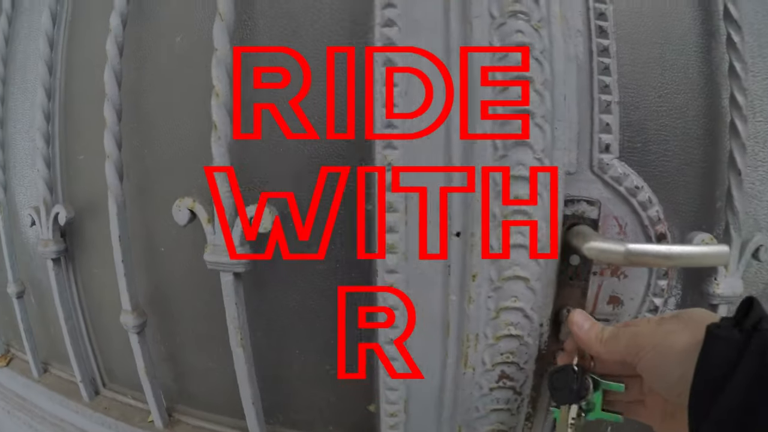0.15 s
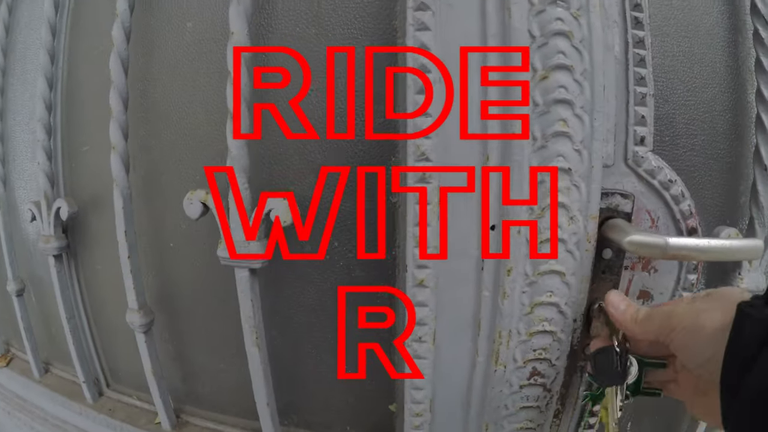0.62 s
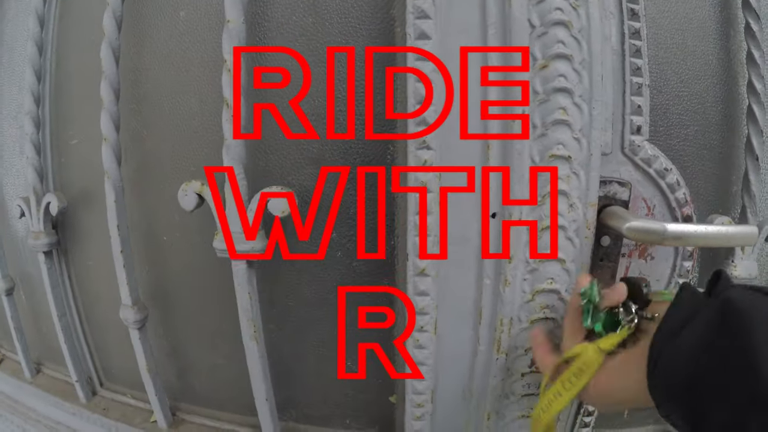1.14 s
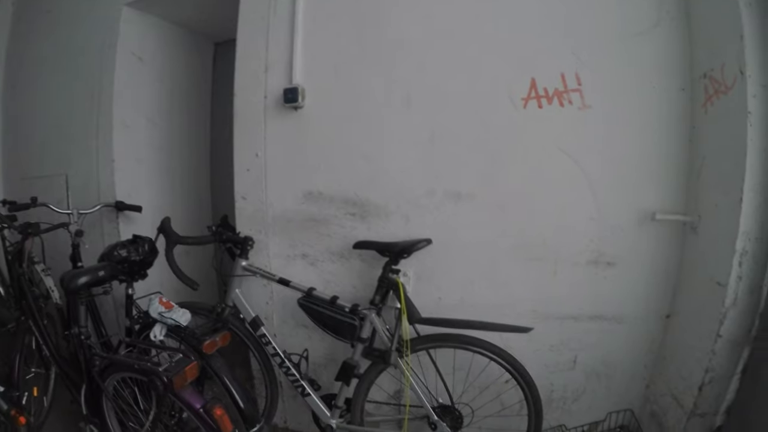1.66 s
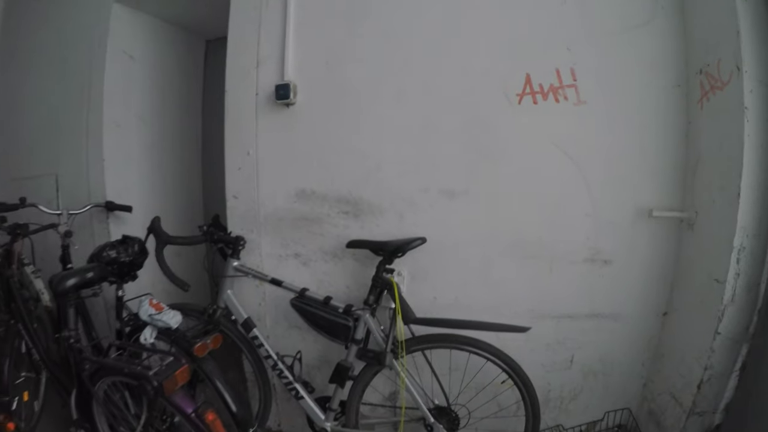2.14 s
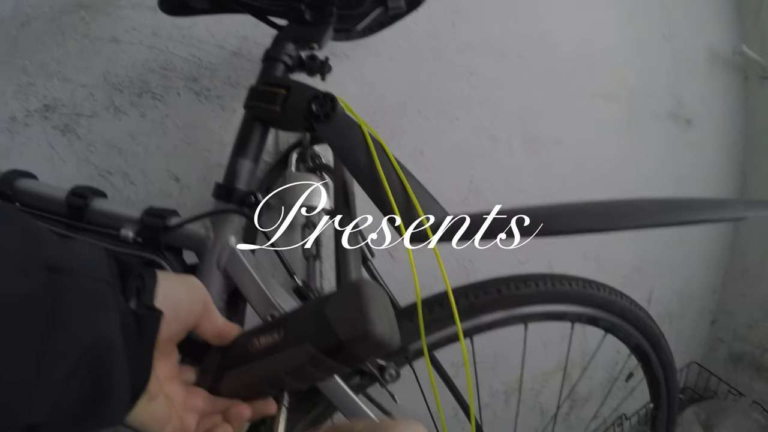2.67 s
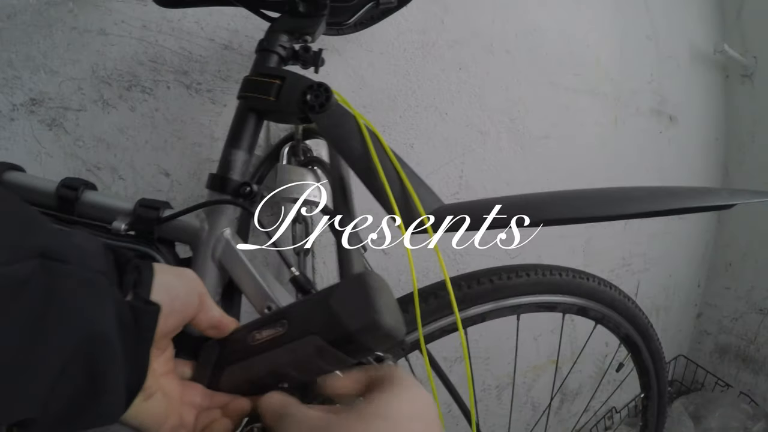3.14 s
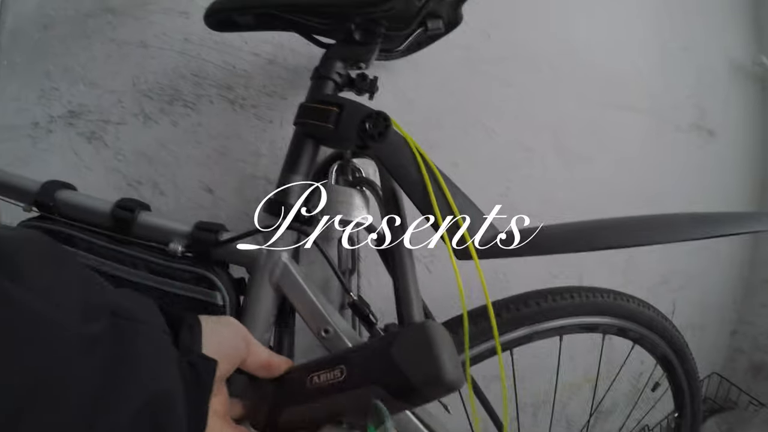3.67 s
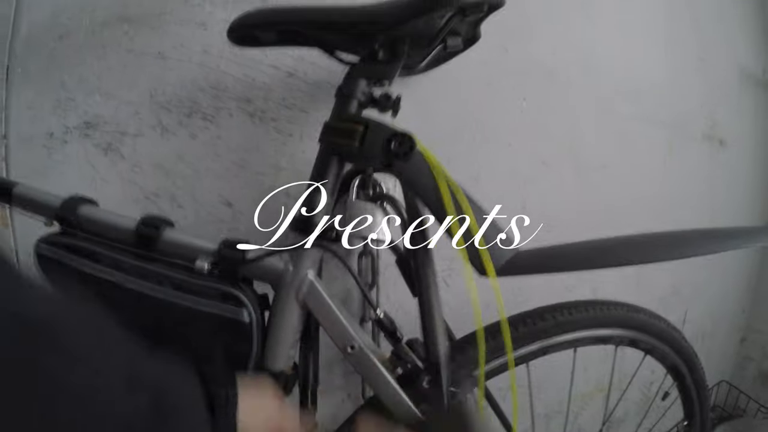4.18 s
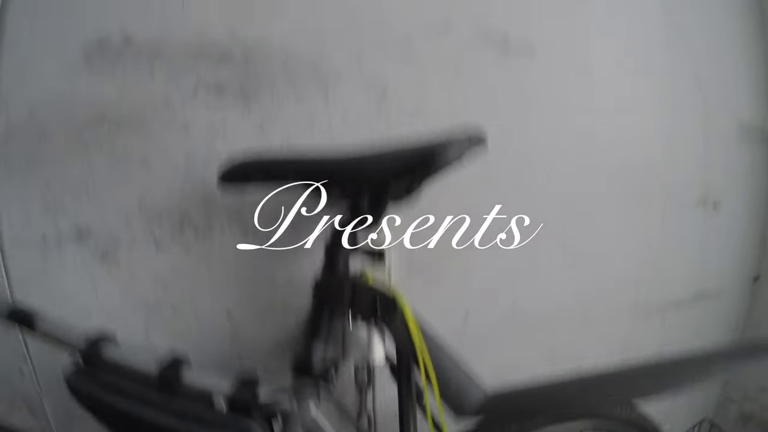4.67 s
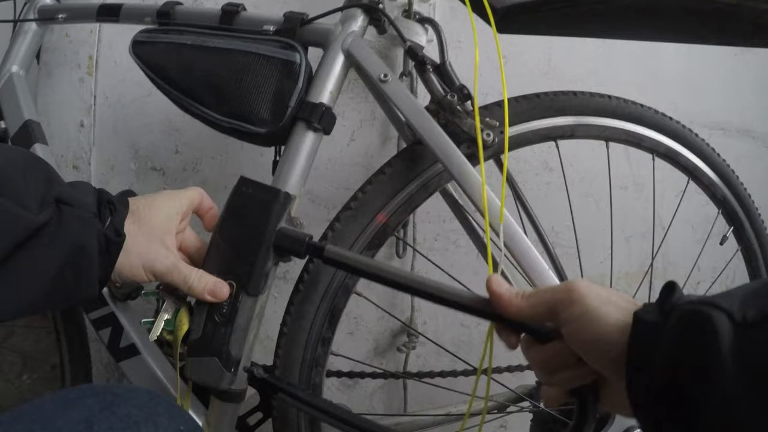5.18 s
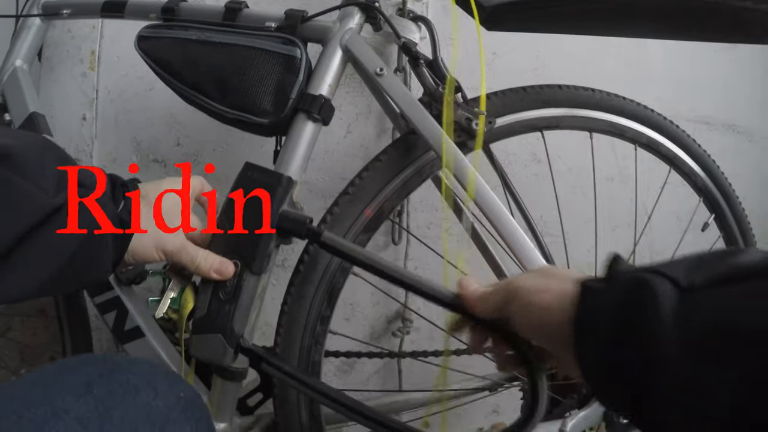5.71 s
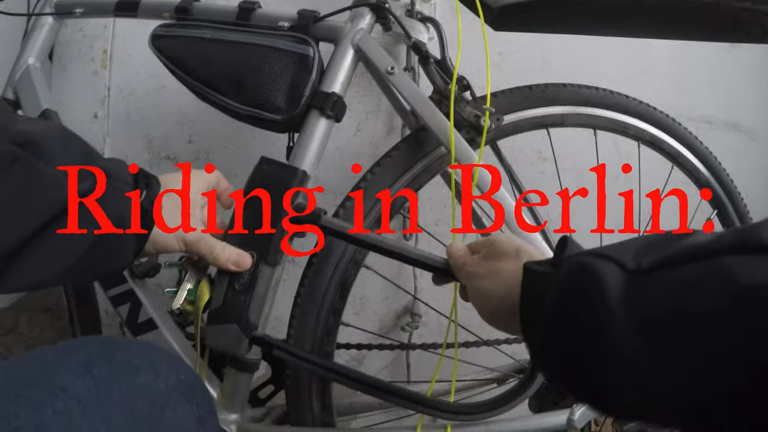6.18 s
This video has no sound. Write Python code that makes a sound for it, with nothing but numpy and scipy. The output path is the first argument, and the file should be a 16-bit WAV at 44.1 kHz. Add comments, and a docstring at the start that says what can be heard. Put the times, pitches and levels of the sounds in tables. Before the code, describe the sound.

A close microphone starts on a brief rustle at a street door, over low rumble. From 0.3 s a key ticks lightly in the lock; clicks thicken from 0.8 s, and a loud double clack with a dull thud lands at 1.22 s, then small scrapes. At 1.5 s a hard cut moves to a quiet, hard-walled passage: sparse faint clinks, a little jingle near 2.3 s. Another cut follows. A dull knock at 2.65 s and a sharp snap at 2.89 s lead into bright key jingling, with a piercing ping at 3.41 s and thin tinkles until 4.1 s. At 4.2-4.4 s a steel link clanks and rings, the lock thumps the frame, and loose fittings shudder. Cloth rustles; a hard crack comes at 5.05 s with echo. After a cut at 5.26 s it is quiet, with a knock and rustle at 5.74 s and soft bumps around 6 s, ending at 6.4 s.

```python
"""First, at a door, a key is turned with small clicks and pulled from the lock.
Then, in a hard-walled passage, a bunch of keys jingles, a folding bike lock is unlatched, knocked against
the frame and unfolded. Short bursts of noise make the contacts; decaying sines make the ringing metal.
Hands and cloth rustle and street rumble lies under it all; three hard cuts join four places.
Each place adds its own echo."""
import sys
import numpy as np
from scipy import signal
from scipy.fft import rfft, irfft
from scipy.io import wavfile

SR = 44100
rng = np.random.default_rng(int(sys.argv[2]) if len(sys.argv) > 2 else 0)


def file_out(sig):
    """Save sig as 16-bit WAV at sys.argv[1]."""
    # one column per channel
    cols = np.atleast_2d(sig).T
    # limit, then scale
    lim = np.clip(cols, -1, 1)
    pcm = np.round(lim * 32767).astype(np.int16)
    wavfile.write(sys.argv[1], SR, pcm)


def boost_factor(decibels):
    """Convert a level in decibels to a linear amplitude factor."""
    exponent = np.asarray(decibels, float) / 20
    return 10 ** exponent


N = 279053


def rms_one(x):
    """Scale to rms 1."""
    return x / np.sqrt(np.mean(x ** 2) + 1e-20)


def in_time(rows):
    """Draw straight lines between the points of a table, one value per sample for each column."""
    seconds, *columns = np.transpose(rows)
    return [np.interp(np.arange(N) / SR, seconds, column) for column in columns]


def at_door():
    """True for the samples before the first place, the door, ends."""
    return np.arange(N) < PLACES[0][1] * SR


def coloured(x, spectrum):
    """Shape the spectrum of x through (frequency [Hz], relative density [dB per Hz]) points; rms 1."""
    hz, db = np.transpose(spectrum)
    grid = np.maximum(np.arange(N // 2 + 1) * SR / N, 1)
    gain = boost_factor(np.interp(np.log(grid), np.log(hz), db))
    return rms_one(irfft(rfft(x) * gain, N))


def band(x, low_hz, high_hz):
    """Keep the sound between two frequencies with a Butterworth filter."""
    return signal.sosfilt(signal.butter(2, [low_hz, high_hz], "band", fs=SR, output="sos"), x)


def grains(spread_db):
    """A tiny touch at every sample, few of them large; rms 1."""
    sizes = boost_factor(spread_db * np.minimum(rng.exponential(1, N), 6))
    return rms_one(sizes * rng.choice([-1, 1], N))


def ring(clicks, hz, t60):
    """A unit click starts a dying sine of height 1, which falls by 60 dB in t60 seconds."""
    r, w = boost_factor(-60 / (t60 * SR)), 2 * np.pi * hz / SR
    return signal.lfilter([0, np.sin(w)], [1, -2 * r * np.cos(w), r * r], clicks + 1e-18)


def hollow(x, peaks):
    """Add resonances (frequency [Hz], width [Hz], level [dB]) to the plain sound."""
    out = x
    for hz, width, db in peaks:
        r = np.exp(-np.pi * width / SR)
        poles = [1, -2 * r * np.cos(2 * np.pi * hz / SR), r * r]
        out = out + boost_factor(db) * signal.lfilter([(1 - r * r) / 2, 0, (r * r - 1) / 2], poles, x)
    return out


def bursts(rows, gains_db, rise):
    """Loudness shapes that swell for a share of each event's t60, then die away ever faster."""
    t, shape = np.arange(SR // 2) / SR, np.zeros((gains_db.shape[1], N + SR))
    for (start, t60), db in zip(rows, gains_db):
        swell = 1 - np.exp(-t / (rise * t60))
        fall = boost_factor(-60 * (t / t60) ** 1.1) * swell
        shape[:, round(start * SR):][:, :len(t)] += boost_factor(db)[:, None] * fall / fall.max()
    return shape[:, :N]


# loudness of the street rumble: (time [s], level [dB])
RUMBLE_LEVEL = [(0, -33.5), (.85, -30.5), (1.5, -34), (2.3, -38.5), (4.2, -35.5), (4.5, -33), (5.4, -37),
                (6.33, -39)]
# rumble heard at the door: (frequency [Hz], relative density [dB per Hz])
DOOR_RUMBLE = [(12, -8), (28, 0), (55, 1), (80, -11.5), (180, -19), (300, -32.5), (500, -63)]
# rumble gathered on the low modes of the passage walls: (frequency [Hz], relative density [dB per Hz])
PASSAGE_RUMBLE = [(15, -25), (35, 4), (50, -6), (65, -2.5), (95, -19.5), (130, -20.5), (170, -24),
                  (330, -33.5), (500, -63.5)]
# steady hush: (frequency [Hz], relative density [dB per Hz])
HUSH = [(71, -16.5), (120, -3.5), (177, -9.5), (282, -19), (332, 8.5), (509, -11.5), (5170, -16.5),
        (11900, -41), (15500, -30.5)]
HUSH_DB = -62.5


def street():
    """Low shaped noise swells and sinks as rumble, over a steady hush."""
    rumble_db, = in_time(RUMBLE_LEVEL)
    traffic = rng.standard_normal(N)
    rumble = np.where(at_door(), coloured(traffic, DOOR_RUMBLE), coloured(traffic, PASSAGE_RUMBLE))
    hush = coloured(rng.standard_normal(N), HUSH)
    return boost_factor(rumble_db) * rumble + boost_factor(HUSH_DB) * hush


def busy():
    """How many contacts fall near each moment; one contact reaches about 47 ms to either side."""
    reach_s = 0.047
    moments = np.arange(0, N / SR, 1 / 1000)
    near = sum(np.exp(-.5 * ((moments - row[0]) / reach_s) ** 2) for row in TURNS + CLINKS + KNOCKS)
    return np.interp(np.arange(N) / SR, moments, near)


# hands, cloth and sliding links, before crowded contacts raise them:
# (time [s], dull level [dB], bright level [dB])
RUSTLE = [(0.0, -25.5, -35.5), (.082, -49, -66), (.185, -55, -99), (1.3, -49, -64), (1.529, -56.5, -63),
          (2.01, -57.5, -55), (2.14, -64, -73.5), (2.36, -59, -62), (2.908, -56, -62.5),
          (3.3, -55.5, -58.5), (3.634, -53.5, -64.5), (3.84, -56, -59.5), (4.188, -60, -72.5),
          (4.4, -33.5, -67.5), (4.56, -37, -69), (4.949, -57.5, -63.5), (5.238, -55.5, -54.5),
          (5.273, -60.5, -73.5), (5.72, -66, -72.5), (5.8, -41, -47.5), (5.961, -56, -66),
          (6.326, -62, -68)]
# colour of the dull rubbing: (frequency [Hz], relative density [dB per Hz])
DULL = [(88, -23.5), (150, -2), (385, 7), (713, 4), (861, 3), (1280, -1), (2100, -0.5), (9000, -23.5),
        (11700, -48), (19800, -120)]
# colour of the bright key rattle: (frequency [Hz], relative density [dB per Hz])
BRIGHT = [(1500, -16.5), (3000, -1.5), (4700, 1), (5800, -0.5), (6800, -1.5), (9000, -4.5), (15500, -12.5)]


def rustle():
    """Rubbing makes dense dull grains; keys add bright grains in small random rattles."""
    (dull_db, bright_db), crowd = in_time(RUSTLE), busy()
    # each nearby contact raises the rustle by these dB
    dull_db, bright_db = dull_db + 1 * crowd, bright_db + 3.5 * crowd
    # about 90 small knocks a second, each fading with a 4 ms time constant
    knocks = (rng.random(N) < 90 / SR) * boost_factor(7.2 * rng.exponential(1, N).clip(0, 3))
    rattles = rms_one(2.9 + signal.lfilter([1], [1, -np.exp(-1 / (.004 * SR))], knocks))
    dull = coloured(grains(spread_db=4.0), DULL)
    bright = coloured(grains(spread_db=5.0) * rattles, BRIGHT)
    return boost_factor(dull_db) * dull, boost_factor(bright_db) * bright


# dull thuds of the lock on door or frame: (time [s], level [dB], t60 [s])
THUDS = [(1.235, -28.5, 0.22), (2.333, -49, 0.042), (3.683, -47, 0.21), (3.81, -43.5, 0.56),
         (4.342, -21.5, 0.056), (4.375, -29, 0.16), (5.742, -33, 0.14), (5.974, -38.5, 0.083),
         (6.031, -44, 0.077)]


def thuds():
    """Soft heavy knocks: dying noise, mostly between 110 and 900 Hz."""
    rows = np.array(THUDS)
    noise = rms_one(band(rng.standard_normal(N), 110, 900))
    return noise * bursts(rows[:, [0, 2]], rows[:, [1]], rise=0.0054)[0]


# the bike frame shudders after a bump: (time [s], level [dB], t60 [s])
SHUDDERS = [(4.375, -29.5, 0.73), (4.53, -32.5, 0.15)]
# frame tubes: (frequency [Hz], relative level [dB])
TUBES = [(1500, -2), (2055, -1), (2400, 0), (2872, -2), (3323, -2), (3900, -8)]


def frame():
    """Loose fittings rattle on the tubes, which ring for 16 ms, until the shudder dies."""
    rows = np.array(SHUDDERS)
    touch = grains(spread_db=7.0)
    tubes = rms_one(sum(boost_factor(db) * ring(touch, hz, t60=.016) for hz, db in TUBES))
    return tubes * bursts(rows[:, [0, 2]], rows[:, [1]], rise=0.0027)[0]


# blows on a steel link: (time [s], level [dB], dulling above 5 kHz [dB per kHz])
CLANKS = [(4.2223, -24, 1.5), (4.259, -5, 0.2)]
# modes of the link: (frequency [Hz], level relative to the blow [dB], t60 [s])
LINK_MODES = [(2060, -24, .04), (2880, -20, .2), (3806, -12, .23), (4996, 2, .066), (5000, -29, .14),
              (6180, -13, .13), (6192, -26, .4), (7477, -19, .35), (8312, -38, .2), (9087, -13, .09),
              (9216, -21, .22), (10470, -32, .36), (12050, -16, .05), (12030, -32, .28), (13750, -17, .03),
              (14480, -16, .066)]


def link():
    """A blow makes all modes of the steel link ring, in slightly different strengths each time."""
    blows, out = np.array(CLANKS), np.zeros(N)
    luck_db = rng.normal(0, 1, (len(blows), len(LINK_MODES)))
    for k, (hz, db, t60) in enumerate(LINK_MODES):
        dulling_db = blows[:, 2] * max(hz / 1000 - 5, 0)
        clicks = np.zeros(N)
        clicks[(blows[:, 0] * SR).astype(int)] = boost_factor(blows[:, 1] + db + luck_db[:, k] - dulling_db)
        out += ring(clicks, hz, t60)
    tremble_db = 1 * rms_one(band(rng.standard_normal(N), 43, 190))
    return band(out, 2000, 19000) * boost_factor(tremble_db)


# single keys left ringing: (time [s], level before the tremble [dB], nearest mode [Hz])
PINGS = [(1.529, -39, 5830), (2.296, -26, 4670), (3.199, -29, 5830), (3.236, -40, 12640),
         (3.325, -30, 14950), (3.329, -42.5, 10530), (3.409, -7.5, 14950), (3.41, -17, 12640),
         (3.411, -22, 11250), (3.410, -34.5, 14060), (3.413, -29, 6233), (3.634, -49, 10530),
         (3.701, -26, 14500), (3.752, -40, 11890), (3.79, -27.5, 14500), (3.79, -34, 9700),
         (3.813, -27, 12640), (3.823, -25.5, 11250), (3.824, -41.5, 7960), (3.826, -23.5, 14950),
         (3.836, -18, 14500), (3.899, -37, 7960), (3.91, -40.5, 14060), (3.952, -16, 14500),
         (3.956, -36, 9700), (3.994, -32.5, 7960), (3.76, -56.5, 5620), (3.997, -41, 5620),
         (3.996, -27.5, 4670), (3.999, -19, 14500), (4.085, -30, 5830), (4.668, -51.5, 14060),
         (5.05, -36, 11890)]
# modes of the key bunch, played by pings() and shimmer():
# (frequency [Hz], relative level when brushed [dB], t60 when struck alone [s])
KEY_MODES = [(4670, -31, .05), (5620, -28, .25), (5830, -28, .06), (6233, -36, .08), (7360, -38, .08),
             (7960, -34, .09), (9700, -38, .14), (10530, -37, .18), (11250, -34, .06), (11890, -37, .17),
             (12640, -35, .05), (13680, -36, .05), (14060, -35, .07), (14500, -30, .04), (14950, -33, .05)]


def pings():
    """A ping sets one key mode ringing; neighbours brush the key, so the ring trembles and is soon damped."""
    out, t = np.zeros(N + SR), np.arange(SR // 2) / SR
    tremble = boost_factor(4 * rms_one(band(rng.standard_normal(N + SR), 30, 250)))
    for start, db, hz in PINGS:
        mode_hz, _, t60 = min(KEY_MODES, key=lambda mode: abs(mode[0] - hz))
        fade = boost_factor(db - 60 * t / t60) * (1 - np.exp(-t / 0.00029))
        out[round(start * SR):][:len(t)] += fade * np.sin(2 * np.pi * mode_hz * t)
    return (out * tremble)[:N]


def shimmer(touches):
    """All touches stir the key modes; how freely a key hangs changes every 25 ms, less freely at the door."""
    out, free = 0, np.where(at_door(), .3, 1)
    for hz, db, _ in KEY_MODES:
        loose = np.repeat(boost_factor(rng.normal(db, 4.5, N // 1100 + 1)), 1100)[:N]
        out = out + ring(touches * free * loose, hz, t60=.045)
    return boost_factor(-5) * out


def parts(x, times, scatter_db):
    """Small parts resonate, with new strengths at every contact but the same total."""
    width_hz = 320  # at 2 kHz; higher parts are wider
    order = np.argsort(times)
    latest = order[np.maximum(np.searchsorted(times[order] * SR, np.arange(N)) - 1, 0)]
    centres = np.geomspace(2200, 14000, 14)
    luck_db = rng.normal(0, 1, (len(times), len(centres))).clip(-3, 2) * scatter_db[:, None]
    luck = boost_factor(luck_db)
    luck = luck / np.sqrt(np.mean(luck ** 2, axis=1, keepdims=True))
    out = x
    for k, hz in enumerate(centres):
        stirred = x * (luck[latest, k] - 1)
        # keep the resonance alone, without the plain sound
        out = out + hollow(stirred, [(hz, width_hz * np.sqrt(hz / 2000), 0)]) - stirred
    return out


# The levels below hold before the locks and small parts colour the sound.
# key working in the door lock: (time [s], level [dB], treble over bass [dB], chatter t60 [s])
TURNS = [(0.315, -54, 16, 0.093), (.357, -42.5, -6, 0.039), (0.377, -55, 10, .02),
         (0.398, -42.5, -19.5, 0.046), (.461, -53, -12, .02), (0.5204, -49.5, -27, 0.037),
         (0.5343, -50, 24, .017), (0.6037, -38, -0.5, 0.034), (0.651, -60, 33, 0.037),
         (0.721, -50.5, -23, 0.019), (0.7693, -48, 3.5, 0.014), (0.7833, -44, 13, 0.017),
         (0.8022, -41.5, 8.5, 0.077), (0.8204, -36.5, -4, 0.071), (.836, -40, 11.5, 0.048),
         (0.8535, -33.5, -1.5, 0.096), (0.887, -48.5, 18, 0.029), (0.9611, -34.5, 0.5, 0.041),
         (0.9766, -32.5, -10, 0.017), (0.992, -48, 0.5, 0.03), (1.003, -34, 14, 0.016),
         (1.01, -39, -1, 0.14), (1.1187, -34.5, -8, 0.046), (1.139, -32, -10.5, 0.058),
         (1.1598, -35, 3, 0.043), (1.177, -42, -5, 0.015), (1.189, -28.5, -7, 0.12),
         (1.21, -35, -29.5, 0.02), (1.222, -15, -9.5, 0.023), (1.2268, -14, -8, 0.055),
         (1.341, -48.5, 10, 0.037), (1.3654, -35.5, 8, 0.031), (1.3849, -39, -2, 0.067),
         (1.457, -54.5, 14, 0.044), (1.4814, -47, 25, 0.073)]
# keys clinking together: (time [s], level [dB], treble over bass [dB], chatter t60 [s])
CLINKS = [(1.7481, -36.5, 3.5, 0.012), (1.8524, -65, 53, 0.018), (2.2222, -48.5, 17, 0.01),
          (2.2438, -46.5, 25, 0.019), (2.268, -49, 10, 0.38), (2.298, -42, 28, 0.037),
          (2.303, -38.5, 22.5, 0.047), (2.853, -58, 27, 0.022), (2.959, -38, -6, 0.06),
          (2.9987, -22, 2.5, 0.008), (3.0126, -34, 1.5, 0.031), (3.0233, -32.5, 4.5, 0.05),
          (3.0942, -34, 3, 0.054), (3.1138, -37.5, 15, 0.035), (3.1291, -26, 13, 0.011),
          (3.136, -34.5, 5, 0.11), (3.2, -41.5, 14.5, .03), (3.2836, -41.5, 10, 0.028),
          (3.31, -52.5, 8, 0.017), (3.3222, -40, 12.5, 0.039), (3.366, -61.5, 8, 0.019),
          (3.41, -37, 20, 0.073), (3.452, -42, 1, 0.12), (3.4813, -45, 24.5, 0.16),
          (3.4992, -35, 14, 0.023), (3.688, -46, 26, 0.022), (3.703, -45, 19.5, 0.023),
          (3.73, -44.5, 4, 0.052), (3.7492, -40, 0, 0.056), (3.7866, -52, 5, 0.016),
          (3.823, -34, 17.5, 0.05), (3.835, -42, 8, .025), (3.845, -41.5, 31, .03),
          (3.902, -47.5, 41, 0.021), (3.952, -35.5, 22.5, 0.049), (3.9929, -38, 16, 0.036),
          (4.002, -41, 24, 0.036), (4.056, -43.5, 24.5, 0.019), (4.104, -54, 23.5, 0.049),
          (4.121, -49, 14.5, .02), (4.084, -48.5, 27.5, 0.017), (4.159, -48, 8.5, 0.013),
          (4.217, -45, 3.5, 0.013), (4.313, -42, 17.5, 0.027), (4.67, -59.5, 21.5, 0.02),
          (4.7475, -42.5, -3, 0.14), (4.845, -49.5, 7, 0.2), (4.875, -46, -8.5, 0.11),
          (4.909, -49.5, 0, 0.14), (4.957, -43.5, 5.5, 0.051), (5.0, -42, 9.5, 0.049),
          (5.0277, -45.5, 17, 0.079), (5.18, -48, 29.5, 0.062), (5.7983, -37.5, 9, 0.019),
          (6.275, -48.5, -8.5, 0.035)]
# knocks on the folding lock: (time [s], level [dB], treble over bass [dB], chatter t60 [s])
KNOCKS = [(2.6497, -30, -16, 0.022), (2.878, -41.5, -9, 0.048), (2.8852, -11.5, -11, 0.01),
          (4.201, -41, -5, 0.11), (4.226, -31.5, -4.5, 0.13), (4.257, -40, 40, 0.0078),
          (4.298, -39, -26, 0.033), (4.3404, -26.5, -11, 0.042), (4.3788, -24, -17.5, 0.075),
          (5.0498, -13, -6, 0.012), (5.3727, -51, -10, 0.046), (5.7423, -30.5, -11.5, 0.016),
          (5.7476, -48.5, -3, 0.084), (5.974, -54.5, -38, 0.052), (6.031, -46.5, -23.5, 0.027)]
# middle band above the slope from bass to treble: (turns [dB], clinks [dB], knocks [dB])
MIDDLE_DB = [6, 3, 6]
# how unevenly small parts are stirred: (turns [dB], clinks [dB], knocks [dB])
PARTS_SCATTER_DB = [6, 6, 1]
# short hollow colour of the door lock: (frequency [Hz], width [Hz], level [dB])
DOOR_LOCK = [(1150, 400, 0), (2670, 170, 3), (3780, 170, 6), (7500, 300, 4)]
# short hollow colour of the bike lock: (frequency [Hz], width [Hz], level [dB])
BIKE_LOCK = [(667, 190, -9.5), (1080, 360, 5.5), (3350, 70, -8), (3860, 27, -18.5)]


def contacts():
    """A contact is a crack and a short chatter of touches; the lock colours all but its treble."""
    touch, rows = grains(spread_db=2.5), np.array(TURNS + CLINKS + KNOCKS)
    kinds = [len(TURNS), len(CLINKS), len(KNOCKS)]
    above = np.repeat(MIDDLE_DB, kinds)
    db, tilt = rows[:, 1], rows[:, 2] / 2
    levels_db = np.transpose([db - above - tilt, db, db - above + tilt])
    crack_db, crack_s = -1.5, 0.0029  # level over the chatter, t60
    cracks = np.transpose([rows[:, 0], np.full(len(rows), crack_s)])
    chatter_shape = bursts(rows[:, [0, 3]], levels_db, rise=0.0027)
    shape = chatter_shape + bursts(cracks, levels_db + crack_db, rise=0.0083)
    edges = [(650, 8170), (2500, 7300), (7500, 20650)]
    low, mid, high = (band(touch * e, *hz) / np.std(band(touch, *hz)) for e, hz in zip(shape, edges))
    # neighbouring bands meet in opposite phase, so the middle one is turned over
    plain, door = low - mid, at_door()
    body = hollow(plain * door, DOOR_LOCK) + hollow(plain * ~door, BIKE_LOCK)
    return parts(band(body, 390, 17000) + high, rows[:, 0], np.repeat(PARTS_SCATTER_DB, kinds))


def room(x, t60):
    """Dense echoes of noise in octave bands; air and walls eat the treble first."""
    t, echoes = np.arange(SR) / SR, 0
    for hz in 300 * 2.0 ** np.arange(6):
        dying = boost_factor(-60 * t / t60 * (1 + (hz / 5000) ** 1.3))
        echoes = echoes + band(rng.standard_normal(SR), hz, min(2 * hz, 18000)) * dying
    echoes = echoes * np.clip(t / 0.0016, 0, 1)
    return signal.fftconvolve(x, echoes / np.sqrt(np.sum(echoes ** 2)))[:N]


# the four places, with silence in the tiny gaps: (start time [s], end time [s])
PLACES = [(0, 1.498), (1.507, 2.34), (2.342, 5.258), (5.258, 6.4)]
# echo of each place: (level [dB], t60 in the low mids [s])
ROOMS = [(-17.5, 0.68), (-10, 0.43), (-14, 0.94), (-12, 0.78)]


def scene():
    """Metal sounds echo in each place's own room, whose tail ends at the cut; rustle and street stay dry."""
    (dull, bright), touches = rustle(), contacts()
    ringing = shimmer(touches + .5 * bright) + pings() + link()
    metal = touches + ringing + thuds() + frame()
    ground, t, out = dull + bright + street(), np.arange(N) / SR, np.zeros(N)
    for (start, end), (room_db, t60) in zip(PLACES, ROOMS):
        here = (t >= start) & (t < end)
        out += here * (metal + ground + boost_factor(room_db) * room(metal * here, t60))
    return out[None]


def roll_off(x):
    """The treble ends steeply here."""
    return signal.sosfilt(signal.butter(12, 16300, fs=SR, output="sos"), x)


def record(dry):
    """A steep low-pass filter removes the top above 15.5 kHz."""
    mix = signal.sosfilt(signal.cheby2(12, 35, 15500, fs=SR, output="sos"), dry)
    return roll_off(mix)


dry = scene()
out = record(dry)
file_out(out)
```